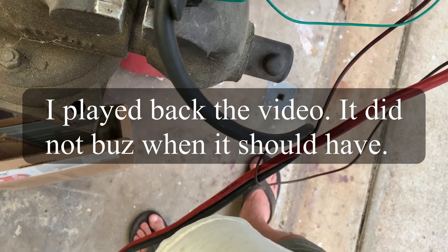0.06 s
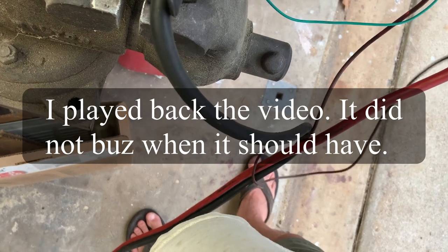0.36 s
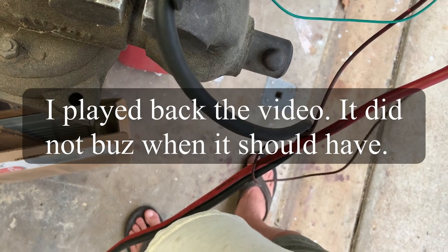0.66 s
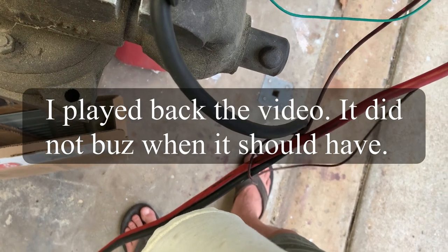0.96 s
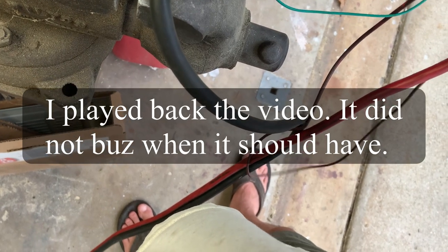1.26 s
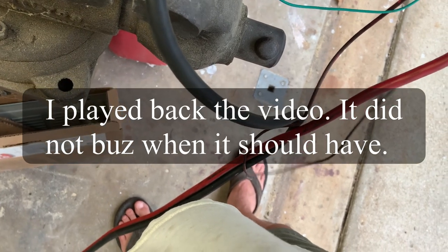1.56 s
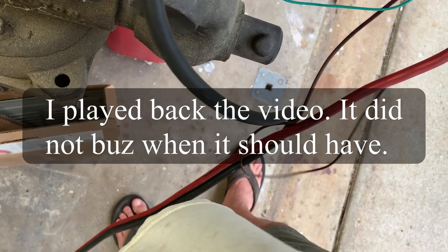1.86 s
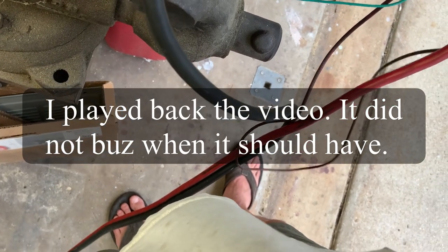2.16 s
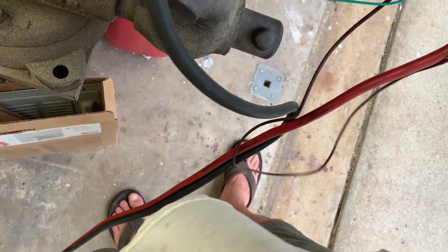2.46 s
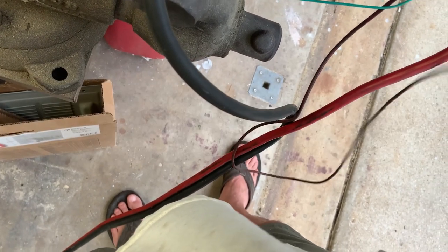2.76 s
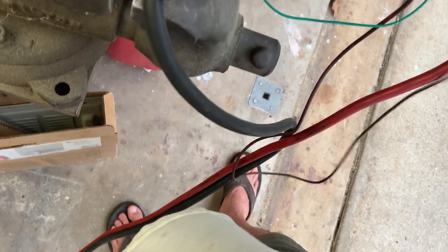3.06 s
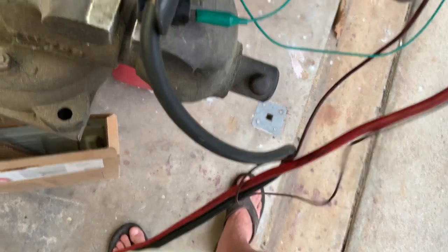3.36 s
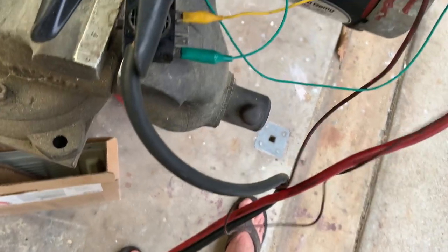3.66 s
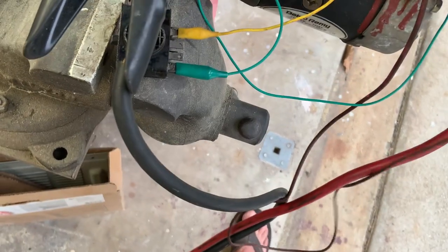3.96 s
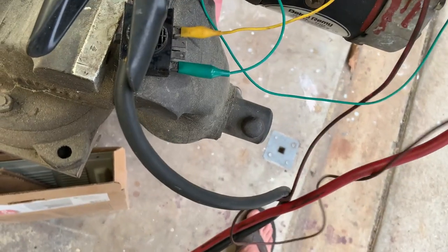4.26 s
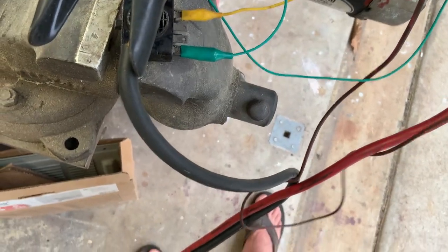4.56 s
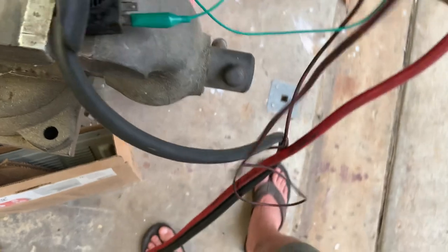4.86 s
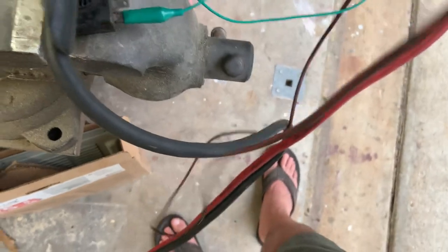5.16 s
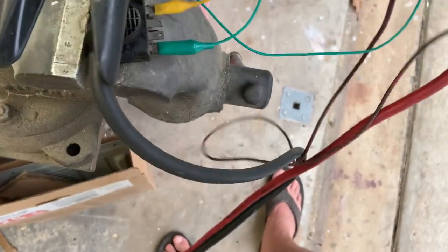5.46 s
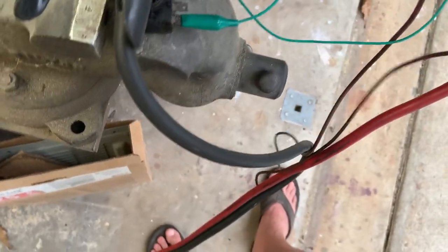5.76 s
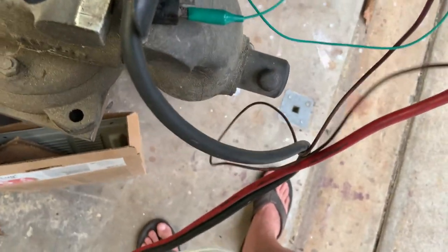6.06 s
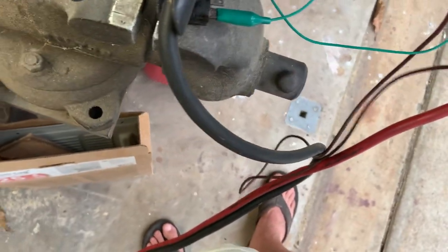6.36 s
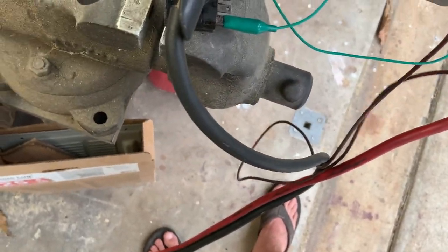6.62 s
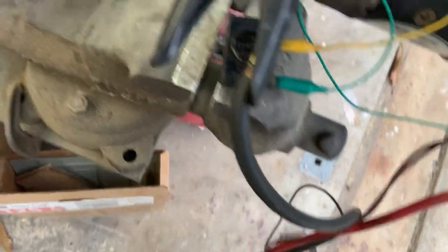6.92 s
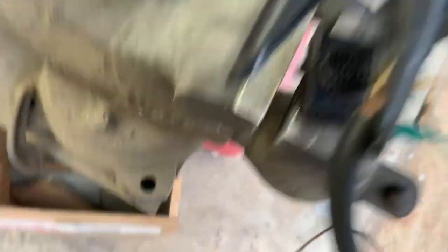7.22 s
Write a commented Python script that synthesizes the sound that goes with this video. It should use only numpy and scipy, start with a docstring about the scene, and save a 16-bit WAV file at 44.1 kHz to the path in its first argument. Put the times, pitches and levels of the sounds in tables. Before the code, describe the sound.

A starter solenoid clacks singly, then chatters rapidly; after a pause the starter motor spins up with a rising hum, whine and hiss.

```python
"""Starter motor on a garage test bench

A wire is touched to the solenoid, close to a hand-held phone. The plunger slams in and springs back,
ringing the iron housing: single tries first, then a chatter of seven clacks a second that nudges the
armature round. After a pause it holds, and the motor spins up with an unbalance hum, a commutator
whine, a whirring drive and hissing brushes."""
import sys
import numpy as np
from scipy import signal
from scipy.fft import rfft, irfft, next_fast_len
from scipy.io import wavfile
from scipy.ndimage import uniform_filter1d

SR = 44100
rng = np.random.default_rng(int(sys.argv[2]) if len(sys.argv) > 2 else 0)


def transcribe(u):
    """Save the signal u as a 16-bit wav file named by the first command-line argument.

    u: samples, shape (n,) or (channels, n), limited to [-1, 1]; the rate is SR.
    q: integer samples, one column per channel.
    """
    v = np.clip(np.atleast_2d(u).T, -1, 1)
    q = np.round(v * 32767).astype(np.int16)
    wavfile.write(sys.argv[1], SR, q)


N = 330309
TIME = np.arange(N) / SR
MOTOR_START_S = 5.613
THIN_TILT_DB = 1.5  # brightening per octave of a fully thin clack

# plunger slams in: (time [s], level [dB], gap to second strike [s], second strike's extra level [dB])
SLAMS = [(0.0444, -5, 0.0071, 4), (0.4053, -6, 0.0072, 7), (0.7949, -4, 0.0081, 2.5),
         (1.1808, -5, 0.0062, 5), (1.4902, -3, 0.0057, 2.5), (1.5548, -5.5, 0.0056, -5),
         (1.803, -2.5, 0.0061, 0.5), (2.193, -4, 0.0061, 0), (2.5019, -4, 0.005, 1.5),
         (2.6289, -4, .0063, 0.5), (2.783, -3.5, .0061, 0), (2.921, -4, .0066, 1),
         (3.0802, -2.5, 0.0071, -1), (3.2532, -1.5, 0.0045, -2.5), (3.4058, -1, 0.007, -3),
         (3.5405, -4, .0056, 2.5), (3.6891, -2.5, 0.0064, -4), (3.8296, -3, .0056, -2),
         (3.9836, -2, 0.0049, -3), (4.1214, -4, 0.0064, 2.5), (4.2574, -3, 0.0055, 1),
         (4.398, -2.5, 0.0043, 0), (5.6411, -3, .0052, -0.5)]
# plunger lands on its back stop: (time [s], level [dB])
RETURNS = [(0.276, -4.5), (0.653, -5), (1.0345, -6.5), (1.3731, -7), (1.673, -10), (2.1125, -8),
           (2.278, -12.5), (2.572, -14.5), (2.741, -11.5), (2.88, -13.5), (3.0307, -12.5), (3.174, -10),
           (3.3456, -12), (3.4992, -10.5), (3.6444, -13), (3.785, -10.5), (3.93, -10), (4.084, -11.5),
           (4.2278, -10.5), (4.3685, -12), (4.521, -11)]
# resonances of the iron housing and its stand: (frequency [Hz], width [Hz], level [dB])
HOUSING = [(131, 33, -4), (185, 12, 0), (230, 8, 2), (306, 38, 1), (470, 34, 0), (503, 22, 4),
           (621, 34, 8.5), (668, 30, 4), (815, 33, 6), (867, 60, 0.5), (1204, 54, 6), (1435, 100, 3),
           (1610, 70, -2), (1780, 56, 1), (2400, 70, -3), (2560, 120, -5.5), (3030, 130, 3),
           (5200, 290, -1.5), (6060, 100, 1), (7130, 400, -1.5), (11170, 620, -6), (15000, 200, 5)]
# resonances of the brush holder: (frequency [Hz], width [Hz], level [dB])
BRUSH_PEAKS = [(3070, 160, -0.5), (4270, 380, -7), (6200, 280, -1), (7900, 400, 2.5)]
# broadband scrape of metal on metal: (frequency [Hz], level [dB])
SCRAPE_COLOUR = [(60, -2.5), (250, -3), (700, -3), (1500, -2), (3500, -4), (7000, -3.5), (11000, -5),
                 (15500, -5.5)]
# dull thud of the stand: (frequency [Hz], level [dB])
THUD_COLOUR = [(20, -40), (35, -20), (54, -7), (70, -3.5), (130, 2), (220, -0.5), (320, -2.5), (600, -8),
               (900, -10.5), (1500, -34), (8000, -72.5)]
# microphone ports: (frequency [Hz], left minus right [dB], unshared part [dB], left's lead [rad])
PORTS = [(60, 2, -28.5, 0.5), (247.5, -1, -20.5, 0.28), (566, 3.5, -2.5, 0.5), (1320, 2, -7, 1.03),
         (1960, 5, -2.5, 3.5), (2640, 0.5, 0, -2), (3253, 1.5, 5, -5), (5190, -6, -9.5, -9),
         (6820, 0, -3, -13.5), (9480, 0, -45, -17), (14170, 0, -32.5, -23), (16500, 4, -27.5, -25.5)]


def undb(db):
    """Decibels to gain."""
    return 10 ** (np.asarray(db) / 20)


def unit(x):
    """Scale to rms 1."""
    return x / np.sqrt(np.mean(x ** 2))


def at_hz(points, hz, column=1):
    """Read a column of a table along log frequency."""
    table = np.transpose(points)
    return np.interp(np.log(np.maximum(hz, 1)), np.log(table[0]), table[column])


def at_time(points, s=TIME):
    """Read an envelope at a time, or at every sample."""
    return np.interp(s, *np.transpose(points))


def add(out, s, sound):
    """Mix a sound in at a time."""
    start = max(int(s * SR), 0)
    out[:, start:start + sound.shape[1]] += sound[:, :N - start]


def flutter(rate_hz):
    """A smooth random wander of rms 1."""
    knots = rng.standard_normal(int(N / SR * rate_hz) + 2)
    return unit(np.interp(TIME * rate_hz, np.arange(len(knots)), knots))


def noise(size):
    """White noise at the two ports, alike in the bass and the top treble."""
    shared, own = rfft(rng.standard_normal((2, size)))
    apart = undb(at_hz(PORTS, np.fft.rfftfreq(size, 1 / SR), column=2))
    return irfft(np.array([shared + apart * own, shared - apart * own]) / np.sqrt(1 + apart ** 2), size)


def colour(x, points, peaks=(), lift_db=0, tilt_db=0):
    """Causal EQ: a smooth curve, tilted per octave, with resonances standing out of it."""
    size = 2 * next_fast_len(x.shape[-1])
    hz = np.maximum(np.fft.rfftfreq(size, 1 / SR), 1)
    power = 1 + sum(undb(db + lift_db) ** 2 / (1 + (2 * (hz - f) / width) ** 2) for f, width, db in peaks)
    gain = undb(at_hz(points, hz) + tilt_db * np.log2(hz / hz.mean())) * np.sqrt(power)
    cepstrum = irfft(np.log(gain))
    cepstrum[1:size // 2] *= 2  # fold to minimum phase
    cepstrum[size // 2 + 1:] = 0
    return irfft(rfft(x, size) * np.exp(rfft(cepstrum)))[..., :x.shape[-1]]


def resonate(hz, peaks):
    """Gain of a tone as it glides through resonances."""
    return sum(undb(db) / (1 + (2 * (hz - f) / width) ** 2) for f, width, db in peaks)


def tail(t60s, size, bands=22):
    """Dense modes dying away band by band, with a flat spectrum overall."""
    t, hz = np.arange(size) / SR, np.fft.rfftfreq(size, 1 / SR)
    centres = np.geomspace(50, SR / 2, bands)
    spectrum, out = rfft(noise(size)), 0
    for centre, pick in zip(centres, np.eye(bands)):
        share = np.interp(hz, centres, pick)
        band = irfft(spectrum * np.sqrt(share), size) * undb(-60 * t / at_hz(t60s, centre))
        out = out + unit(band) * np.sqrt(share.mean() / size)
    return out


def still_air():
    """A faint, bass-heavy bed of room tone."""
    # (frequency [Hz], level [dB])
    tone = [(18, -33), (30, -16), (55, -3.5), (200, -13), (247, -9.5), (680, -27.5), (1200, -27),
            (1520, -33.5), (2370, -25.5), (3680, -34), (15000, -43.5)]
    return undb(-67.5) * unit(colour(noise(N), tone))


def garage(x):
    """Near walls answer within milliseconds; a faint, dull late echo lingers."""
    # decay of the early reflections: (frequency [Hz], t60 [s])
    room_t60 = [(60, 0.93), (250, 0.82), (700, 0.43), (2000, 0.36), (6000, 0.22), (15000, 0.12)]
    # reverb send: (frequency [Hz], level [dB])
    send = [(60, 1), (250, -4), (700, -8.5), (2000, -14.5), (6000, -16.5), (15000, -19)]
    early = tail(room_t60, size=SR) * (1 - np.exp(-TIME[:SR] / 0.004))
    late = undb(-13.5) * tail([(100, 1.2), (1000, 0.5), (8000, 0.69)], size=SR)
    return signal.fftconvolve(x, colour(early + late, send), axes=1)[:, :N]


def coasting():
    """The brushes rub grittily as the chatter nudges the armature round and it coasts to a stop."""
    # swell and fade of the rubbing: (time [s], level [dB])
    envelope = [(2.45, -100), (2.7, -52), (3.6, -43), (4.55, -44.5), (4.7, -55), (4.84, -58), (4.96, -100)]
    # its tone: (frequency [Hz], level [dB])
    tone = [(100, -12.5), (700, 3.5), (2000, 8), (4000, -1.5), (7000, 0.5), (11000, 0), (15500, -8.5)]
    grit = noise(N) * undb(1.8 * flutter(400) + flutter(55))
    return undb(at_time(envelope)) * unit(colour(grit, tone, BRUSH_PEAKS))


def shudder(tone, rise_s, db, size=16384):
    """The housing and its stand shake, swelling and dying away."""
    t = TIME[:size]
    swell = t / rise_s * np.exp(1 - t / rise_s)
    return undb(db) * unit(colour(noise(size), tone, HOUSING, lift_db=11)) * swell


def dense_ring():
    """In the treble the housing's modes crowd into one dense ring."""
    # decay of these modes: (frequency [Hz], t60 [s])
    housing_t60 = [(1000, 0.16), (2000, 0.1), (4000, 0.057), (15000, 0.007)]
    return signal.sosfilt(signal.butter(2, 1470, "high", fs=SR, output="sos"), tail(housing_t60, 8192))


def blow(body, tone, contact_s, crack_db, tilt_db=0, own_peaks=(), square=0, size=8192):
    """Metal contact: tiny impacts and a square hit (share 0-1) crack and ring the housing."""
    spread_s, detune, scatter_db = .0016, .005, 1.5
    impacts = rng.exponential(1, size) * np.exp(-TIME[:size] / contact_s)
    pitch = np.linspace(0, 1, size // 2 + 1)
    # the iron carries the treble fastest, smearing the hit into a chirp
    chirp = unit(irfft(np.exp(-1j * np.pi * SR * spread_s * (pitch - pitch ** 2 / 2))))
    push = lambda chatter: square * chirp + np.sqrt(1 - square ** 2) * unit(chatter * impacts)
    ring = signal.fftconvolve(body, push(rng.standard_normal(size))[None], axes=1)[:, :size]
    # each blow lands a little differently
    modes = [(hz * (1 + detune * rng.standard_normal()), width, db + scatter_db * rng.standard_normal())
             for hz, width, db in [*HOUSING, *own_peaks]]
    crack = undb(crack_db) * push(noise(size))
    sound = colour(unit(ring) + crack, tone, modes, lift_db=4.5, tilt_db=tilt_db)
    attack_rms = np.sqrt(np.mean(sound[:, :SR // 200] ** 2))
    return sound / (3 * attack_rms)  # peaks near 1


def tick(ring):
    """A light touch of the wire or the loose lever."""
    # tone of the tick: (frequency [Hz], level [dB])
    tone = [(60, -18), (700, 6.5), (2000, 0.5), (3900, 2), (6000, -2), (11000, -1), (15500, -5.5)]
    # brief ring of the contacts: (frequency [Hz], width [Hz], level [dB])
    contact_peaks = [(3900, 500, -3)]
    return blow(ring, tone, contact_s=0.0017, crack_db=-2, own_peaks=contact_peaks, size=4096)


def lever_rattle(count=14, size=4096):
    """Small uneven touches of the loose lever scrape the housing and die away."""
    first_db, fade_db_per_s, scatter_db, touch_s = -28, 130, 2.5, .0035
    t, touches = TIME[:size], np.zeros(size)
    touches[rng.integers(0, size, count)] = undb(scatter_db * rng.standard_normal(count))
    touches *= undb(first_db - fade_db_per_s * t)
    envelope = signal.fftconvolve(touches, np.exp(-t / touch_s))[:size]
    return colour(noise(size) * envelope, SCRAPE_COLOUR, HOUSING)


def lasting_ring():
    """Parts sing on after a heavy blow, as decaying sines."""
    # their modes: (frequency [Hz], level [dB], t60 [s])
    modes = [(126.2, -50, 0.41), (374, -48, 0.71), (470, -29, 0.12), (622, -33, 0.16), (663, -31, 0.2),
             (748, -46, 0.45), (817, -28, 0.15), (1191, -45, 0.7), (1199, -36.5, 1.15), (1380, -53, 0.55)]
    t = TIME[:SR]
    return sum(undb(db - 60 * t / t60) * np.sin(2 * np.pi * hz * t) for hz, db, t60 in modes)[None]


def slide(length_s, db):
    """Gritty friction that grows as the plunger gathers speed."""
    size = int(length_s * SR)
    grit = noise(size) * rng.exponential(1, size) * np.linspace(.3, 1, size)
    return undb(db) * unit(colour(grit, SCRAPE_COLOUR, HOUSING, lift_db=5))


def thinness(s):
    """The clacks grow thinner as the chatter goes on."""
    # (time [s], thinness [0-1])
    curve = [(0, 0.2), (2.2, 0.07), (2.7, 0.3), (4.4, 1), (5.64, 0.83)]
    return at_time(curve, s)


def since_slam(s):
    """Seconds since the plunger last slammed in."""
    return min([s - earlier for earlier, *_ in SLAMS if earlier < s], default=np.inf)


def small_contacts(ring):
    """The plunger knocks along its bore just before a slam; the wire and lever give stray ticks."""
    # plunger knocks: (time [s], level [dB])
    knocks = [(0.023, -18), (0.030, -6.5), (0.388, -8), (0.779, -8), (1.162, -11.5), (1.471, -11.5),
              (1.531, -12), (1.784, -13.5), (2.176, -10.5), (2.481, -14.5), (2.611, -18), (2.767, -20.5),
              (2.906, -30), (3.064, -19), (3.226, -24), (3.385, -24), (3.527, -17.5), (3.674, -17.5),
              (3.812, -24), (3.964, -23), (5.621, -17)]
    # stray ticks: (time [s], level [dB])
    ticks = [(0.202, -36.5), (0.370, -18.5), (0.58, -30.5), (0.961, -31.5), (1.572, -11), (2.04, -39),
             (2.129, -18.5), (2.308, -28), (2.44, -28), (2.446, -21), (2.532, -24), (3.106, -14),
             (3.209, -26.5), (3.365, -25.5), (3.476, -23), (4.592, -49)]
    out = np.zeros((2, N))
    for s, db in knocks:
        add(out, s, undb(db) * blow(ring, SCRAPE_COLOUR, contact_s=0.003, crack_db=-3, size=4096))
    for s, db in ticks:
        add(out, s, undb(db) * tick(ring))
    return out


def plunger_returns(ring):
    """The plunger lets go, springs onto its back stop a moment later and thuds the stand."""
    # bright release: (frequency [Hz], level [dB])
    release_tone = [(60, -4), (600, -4), (1500, 2.5), (3000, 7.5), (4500, -1), (7500, 0), (11000, 2.5),
                    (15500, -1)]
    # low shudder under it: (frequency [Hz], level [dB])
    shudder_tone = [(20, -40.5), (35, -25), (55, -16.5), (120, -1), (210, -5), (320, -7.5), (450, -14.5),
                    (700, -6), (1100, -15), (2500, -42.5), (8000, -59.5)]
    # clack on the back stop: (frequency [Hz], level [dB])
    landing_tone = [(30, -28), (55, -22.5), (200, -1), (400, -6.5), (650, -3.5), (950, -2), (1400, 0.5),
                    (1900, -2), (2500, -5), (4000, -13), (7500, -10.5), (11000, -7), (15500, -15.5)]
    out = np.zeros((2, N))
    for s, db in RETURNS:
        body = ring + undb(-1) * dense_ring()  # partly new with each blow
        if since_slam(s) > .15:  # a long hold lets go with a shudder
            release_s = s - .0455
            add(out, release_s, undb(db - 5.5) * blow(body, release_tone, contact_s=0.015, crack_db=1))
            add(out, release_s + 0.0022, shudder(shudder_tone, rise_s=0.011, db=db - 19.5))
        else:  # a short one with a tick of the contacts
            add(out, s - 0.051, undb(db - 1.5) * tick(ring))
        tilt_db = THIN_TILT_DB * thinness(s) - 0.57
        landing = blow(body, landing_tone, contact_s=0.0038, crack_db=1, tilt_db=tilt_db, square=.7)
        add(out, s, undb(db + 2.5) * landing)
        add(out, s, shudder(THUD_COLOUR, rise_s=0.011, db=db - 24.5))
    return out


def plunger_slams(ring, travel_s=.022):
    """The plunger slides in, strikes twice with a midrange clang and thuds the stand."""
    # hard, bright clack: (frequency [Hz], level [dB])
    tone = [(30, -34), (52, -15), (150, -12.5), (400, -6), (700, -5.5), (1500, 4), (2000, 2.5), (2700, -4),
            (4000, -0.5), (7000, 1), (11000, 2.5), (13500, -0.5), (15500, -2.5)]
    out = np.zeros((2, N))
    for s, db, gap_s, second_db in SLAMS:
        body = ring + undb(-1) * dense_ring()
        if since_slam(s) > .2:  # after a rest the wire ticks as it touches
            add(out, s - .037, undb(db - 20.5) * tick(ring))
        add(out, s - travel_s, slide(travel_s, db=-33))
        tilt_db = THIN_TILT_DB * thinness(s)
        clang = (2600, 230, 10.5 - 14 * thinness(s))  # (frequency [Hz], width [Hz], level [dB])
        strike = dict(own_peaks=[clang], square=.7)
        first = blow(body, tone, contact_s=0.0015, crack_db=-7.5, tilt_db=tilt_db - 1, **strike)
        second = blow(body, tone, contact_s=0.002, crack_db=3.5, tilt_db=tilt_db - 1.14, **strike)
        add(out, s, undb(db + 1.5) * first)
        add(out, s + gap_s, undb(db + 2.5 + second_db) * second)
        add(out, s, shudder(THUD_COLOUR, rise_s=0.011, db=db - 26.5))
    return out


def solenoid():
    """Every contact strikes the same housing; heavy blows leave it singing and the lever rattling."""
    ring, singing = dense_ring(), lasting_ring()
    out = plunger_slams(ring) + small_contacts(ring) + plunger_returns(ring)
    for s, db, *_ in [*SLAMS, *RETURNS]:
        add(out, s, undb(db - 12.5 * thinness(s)) * singing)
        add(out, s + .011, undb(db) * lever_rattle())
    return out


def unbalance_hum(hz, turn):
    """The unbalanced armature shakes once a turn, with a faint octave above."""
    # resonances the hum swells through: (frequency [Hz], width [Hz], level [dB])
    peaks = [(134.4, 36, -47.5), (167, 11, -58)]
    return resonate(hz, peaks) * unit(np.sin(turn) + undb(-16.5) * np.sin(2 * turn))


def commutator_whine(hz, turn, speed, bars=23):
    """The bars whine past the brushes; near free speed the brushes bounce and the tone frays."""
    # resonances the whine swells through: (frequency [Hz], width [Hz], level [dB])
    peaks = [(1000, 600, -41), (1520, 380, -43), (3040, 300, -45), (3340, 260, -48), (3510, 160, -39.5),
             (4030, 220, -52), (7100, 700, -47)]
    tones = [(bars, 0), (bars - 2, -13), (2 * bars, -6)]  # (cycles per turn, level [dB])
    fray, jitter_rad, dropout_db = speed ** 14, 3, 8
    angle = turn + jitter_rad * fray * flutter(200) / bars
    whine = sum(undb(db) * resonate(order * hz, peaks) * np.sin(order * angle) for order, db in tones)
    flicker_db = 1.7 * flutter(140) + dropout_db * fray * np.minimum(flutter(30), 1)
    return np.sqrt(2) * whine * undb(flicker_db)


def gears(turn, octaves, harmonics=48, size=2048):
    """One turn of uneven teeth, repeated: faint tones that rise together."""
    spectrum = rng.standard_normal(harmonics) + 1j * rng.standard_normal(harmonics)
    teeth = irfft(np.append(np.zeros(6), spectrum), size)  # from the sixth harmonic up
    position = turn / (2 * np.pi) % 1 * size
    return undb(-45.5 + 3 * octaves) * unit(np.interp(position, np.arange(size), teeth))


def drive_noise(turn, octaves, close_db):
    """The spinning drive rattles and whirrs: resonant noise that pulses once a turn."""
    # narrow resonances of the drive: (frequency [Hz], width [Hz], level [dB])
    peaks = [(257, 10, 19), (394, 10.6, 16.5), (750, 25, -1), (962, 15, -5), (1126, 4.9, 2.5),
             (1228, 12, 2), (1477, 40, -1)]
    # broad rattle: (frequency [Hz], level [dB])
    rattle_tone = [(30, -46), (55, -31), (130, 1.5), (300, -19), (500, 4), (750, 10.5), (1200, 5),
                   (1900, -4), (2400, 1.5), (3500, -2), (5000, -43), (15000, -27)]
    # midrange whirr: (frequency [Hz], level [dB])
    whirr_tone = [(600, -38), (950, -30), (1100, -3.5), (1270, 3), (1500, -0.5), (1750, 2), (2200, -8),
                  (3000, -28)]
    knocking = undb(3.5 * np.cos(turn) + 2 * flutter(350))
    rattle = unit(colour(noise(N) * knocking, rattle_tone, peaks, lift_db=7))
    whirr = unit(colour(noise(N) * knocking, whirr_tone, peaks, lift_db=12))
    return undb(-44 + octaves) * rattle + undb(-41 + 5.5 * octaves + close_db) * whirr


def drive_buzz(octaves, close_db, hz=158.2):
    """Close up, the drive buzzes at a steady pitch."""
    partials = [(6, -61), (7, -50.5), (8, -51), (9, -57)]  # (harmonic, level [dB])
    phase = 2 * np.pi * np.cumsum(hz * (1 + .002 * flutter(60))) / SR
    buzz = sum(undb(db + 2 * flutter(25)) * np.sin(harmonic * phase) for harmonic, db in partials)
    return np.sqrt(2) * buzz * undb(5.5 * octaves + 1.7 * close_db)


def brush_hiss(turn, octaves, close_db):
    """The sparking brushes spit noise that flickers with each turn and rings their holder."""
    # bright hiss: (frequency [Hz], level [dB])
    tone = [(30, -18), (130, -1), (2000, 8.5), (3500, -1), (5000, 2.5), (6300, 1.5), (8000, 5.5),
            (10500, 6.5), (13500, 2.5), (15500, 3.5)]
    sparks = noise(N) * undb(1.15 * np.cos(turn) + 1.94 * flutter(500) + 1.2 * flutter(90))
    return undb(-34 + 3.5 * octaves + 0.55 * close_db) * unit(colour(sparks, tone, BRUSH_PEAKS))


def motor(free_turns_per_s=182.5, spin_up_s=.533):
    """The armature closes in on its free speed exponentially, and every layer follows it."""
    # the phone moves in on the drive: (time [s], level [dB])
    closeness = [(6.72, 0), (6.9, -1.5), (6.99, -.5), (7.04, 4.5), (7.3, 6), (7.49, 4)]
    close_db = at_time(closeness)
    speed = np.maximum(1 - np.exp((MOTOR_START_S - TIME) / spin_up_s), .001)  # share of free speed
    hz, octaves = free_turns_per_s * speed, np.log2(speed)
    turn = 2 * np.pi * np.cumsum(hz * (1 + 0.00266 * flutter(120))) / SR  # shaft angle [rad]
    fade_in = np.clip((TIME - 5.65) / 0.072, 0, 1)
    tones = unbalance_hum(hz, turn) + commutator_whine(hz, turn, speed)
    noises = drive_noise(turn, octaves, close_db) + brush_hiss(turn, octaves, close_db)
    return fade_in * (tones + noises + drive_buzz(octaves, close_db) + gears(turn, octaves))


def scene():
    """Clacks and the jolt of the starting torque echo in the garage; the motor stays dry."""
    impacts = solenoid()
    add(impacts, MOTOR_START_S, shudder(THUD_COLOUR, rise_s=0.016, db=-51))
    return impacts + garage(impacts) + coasting() + motor() + still_air()


def suppress(x, threshold_db=-70.5, slope=0.92, floor_db=-14):
    """Noise suppressor: the treble sinks further whenever it is faint."""
    bass = signal.sosfiltfilt(signal.butter(2, 1800, fs=SR, output="sos"), x)
    treble = x - bass
    power = uniform_filter1d(np.mean(treble ** 2, axis=0), size=1024)
    treble_db = 10 * np.log10(np.abs(power) + 1e-14)
    return bass + treble * undb(np.clip(slope * (treble_db - threshold_db), floor_db, 0))


def record(dry):
    """The ports differ in level and arrival; the phone hushes faint treble, rounds peaks, cuts the top."""
    size = 2 * next_fast_len(N)
    hz = np.fft.rfftfreq(size, 1 / SR)
    port_hz, _, _, lead_rad = np.transpose(PORTS)
    balance = undb(at_hz(PORTS, hz) / 2)
    lag = np.exp(-1j * np.interp(hz, port_hz, lead_rad))
    heard = irfft(rfft(dry, size) * np.array([balance, lag / balance]))[:, :N]
    top_cut = signal.ellip(10, .2, 70, 15800, fs=SR, output="sos")
    return signal.sosfilt(top_cut, np.tanh(suppress(heard)))


dry = scene()
out = record(dry)
transcribe(out)
```